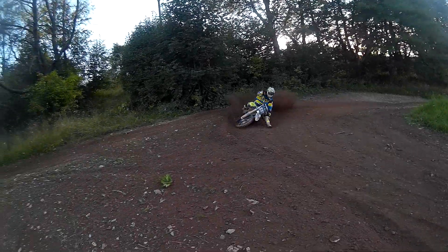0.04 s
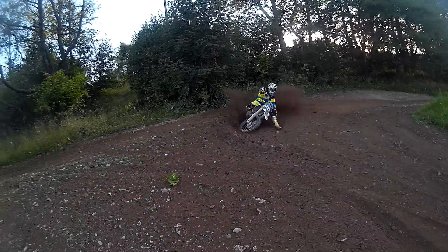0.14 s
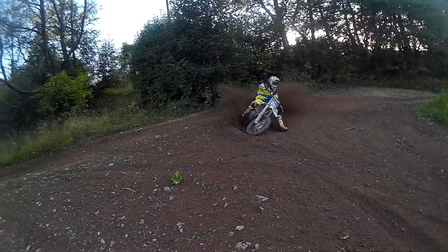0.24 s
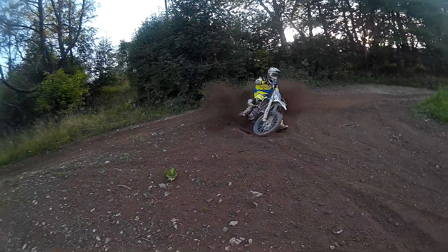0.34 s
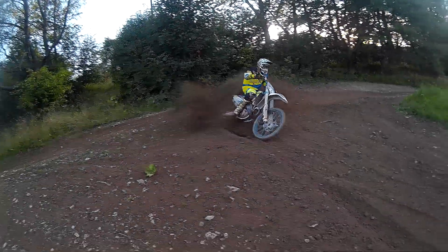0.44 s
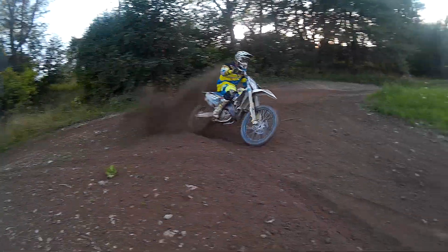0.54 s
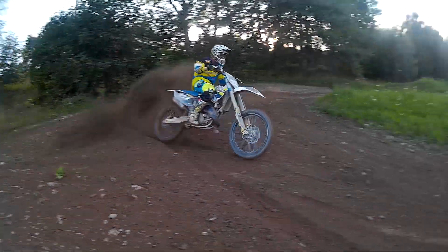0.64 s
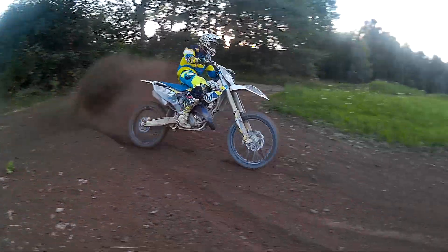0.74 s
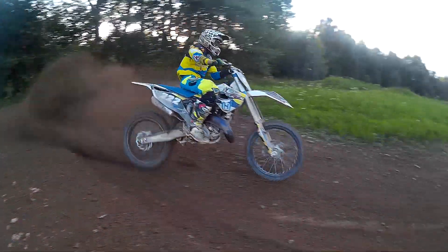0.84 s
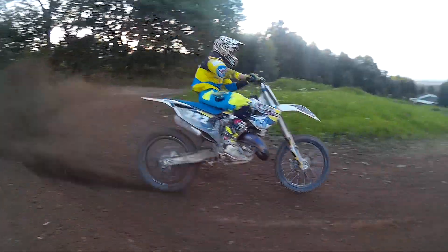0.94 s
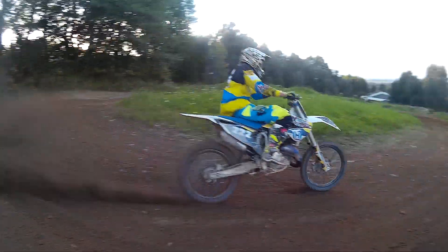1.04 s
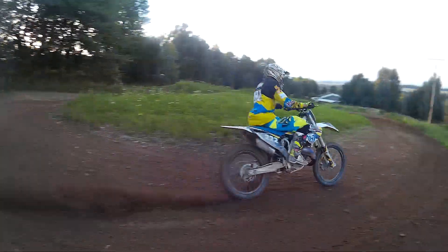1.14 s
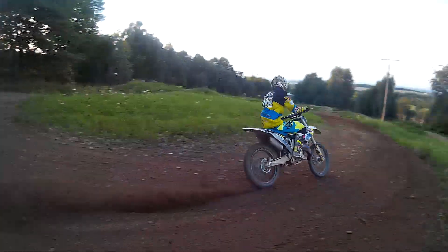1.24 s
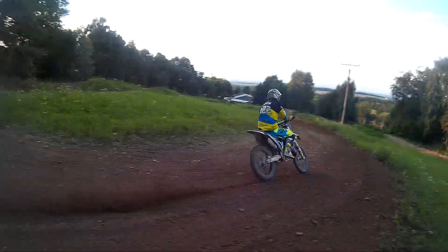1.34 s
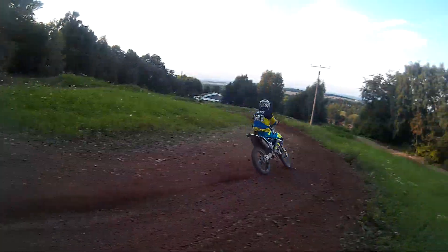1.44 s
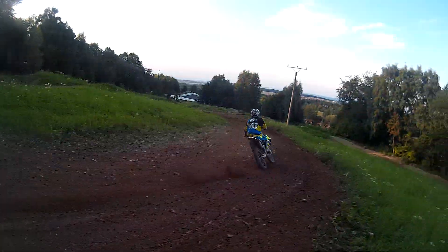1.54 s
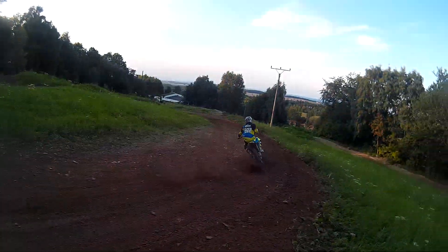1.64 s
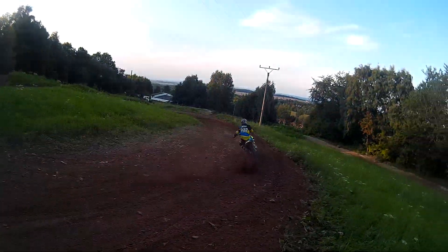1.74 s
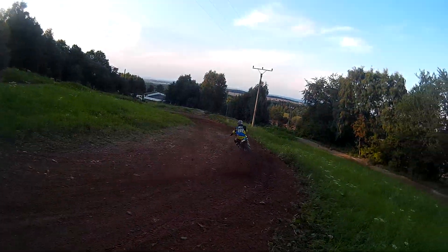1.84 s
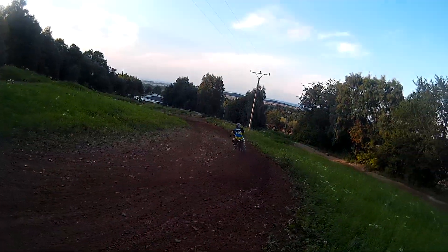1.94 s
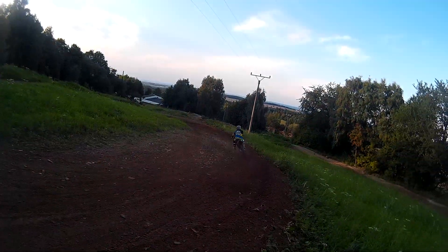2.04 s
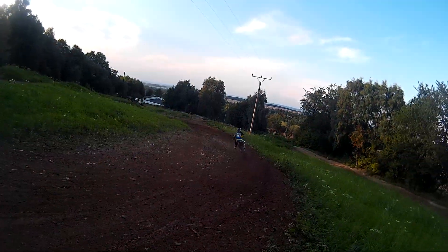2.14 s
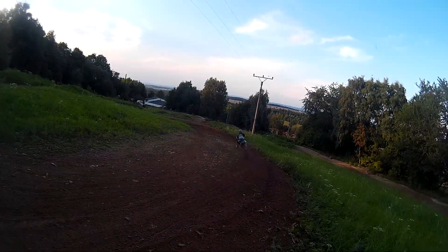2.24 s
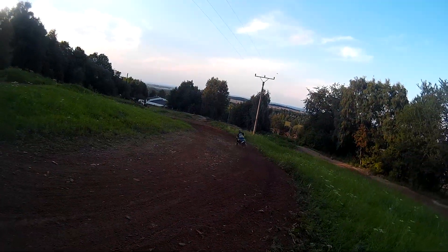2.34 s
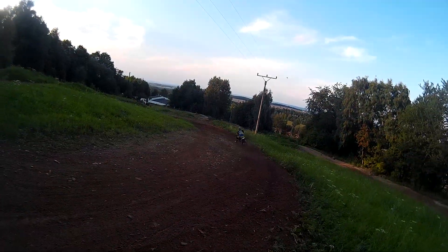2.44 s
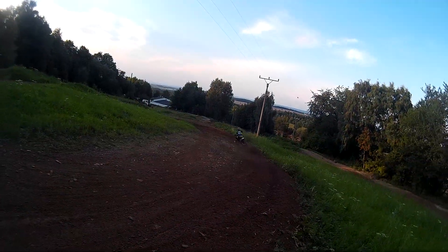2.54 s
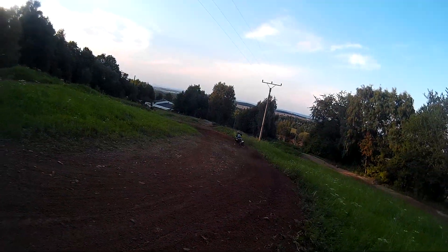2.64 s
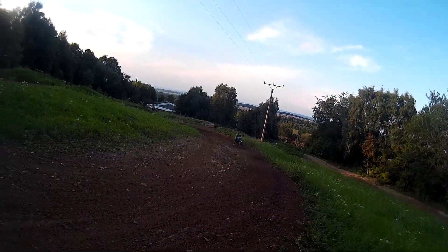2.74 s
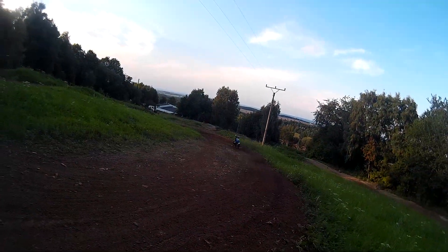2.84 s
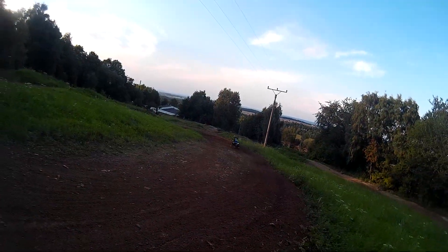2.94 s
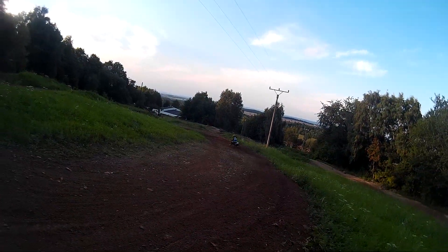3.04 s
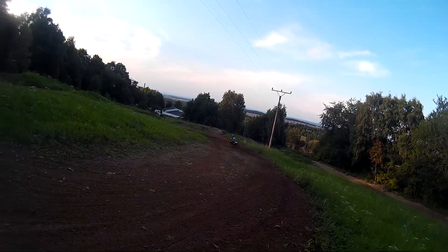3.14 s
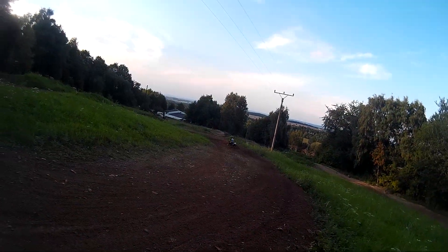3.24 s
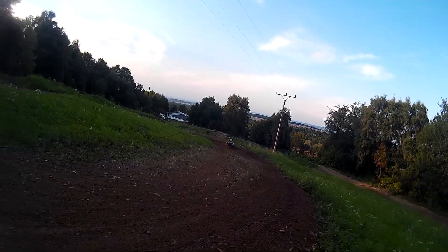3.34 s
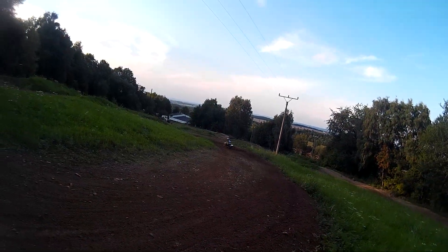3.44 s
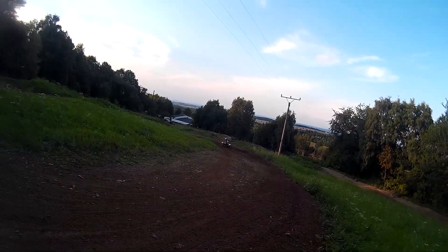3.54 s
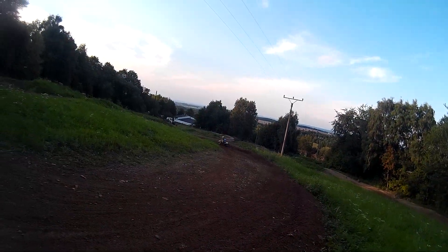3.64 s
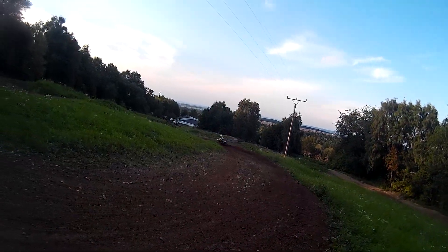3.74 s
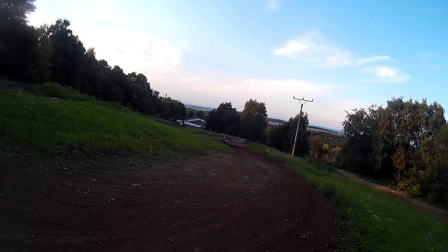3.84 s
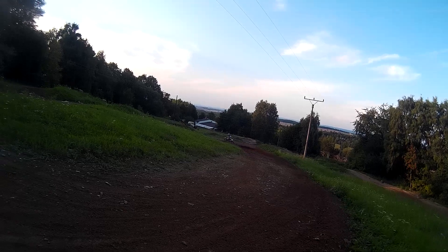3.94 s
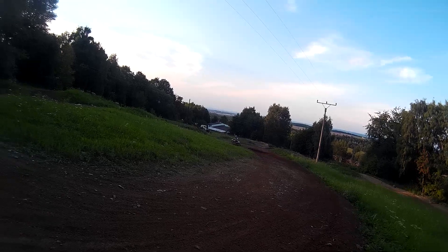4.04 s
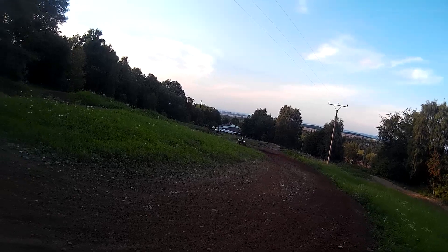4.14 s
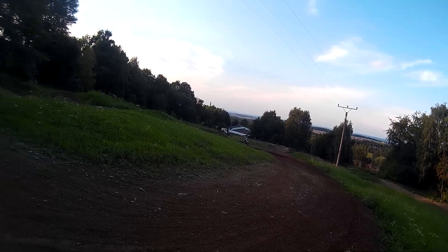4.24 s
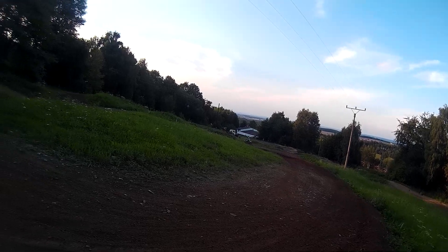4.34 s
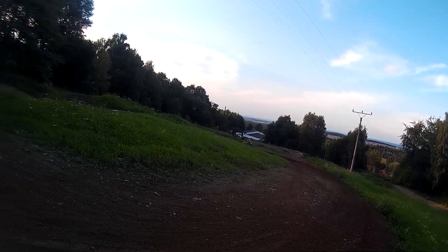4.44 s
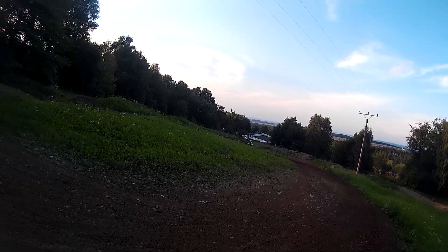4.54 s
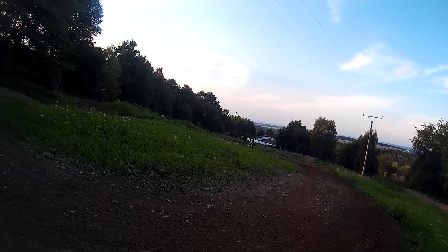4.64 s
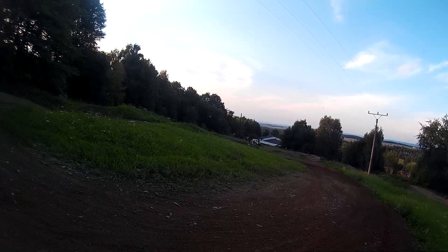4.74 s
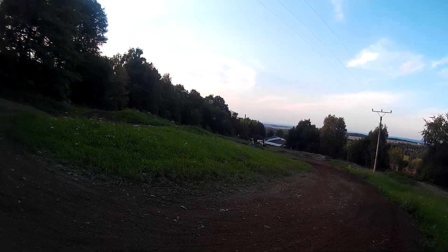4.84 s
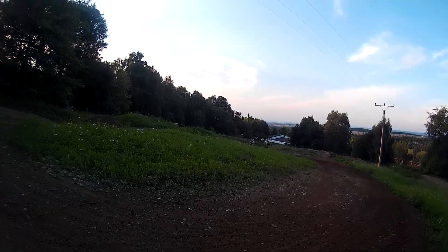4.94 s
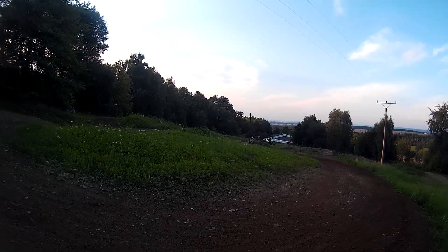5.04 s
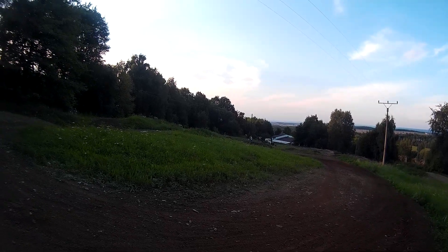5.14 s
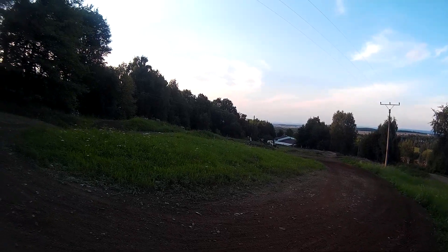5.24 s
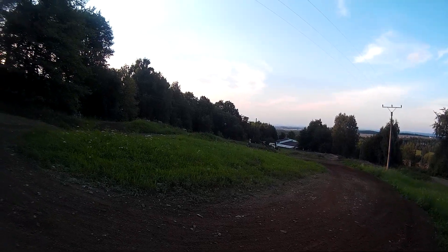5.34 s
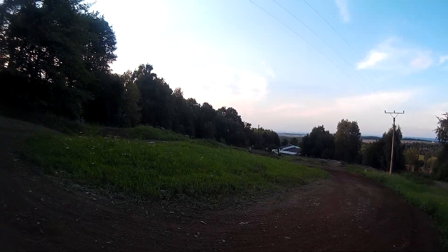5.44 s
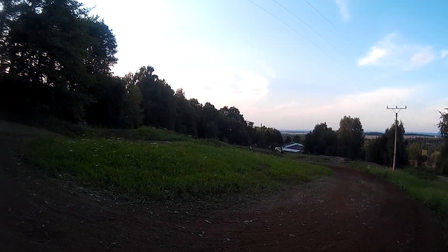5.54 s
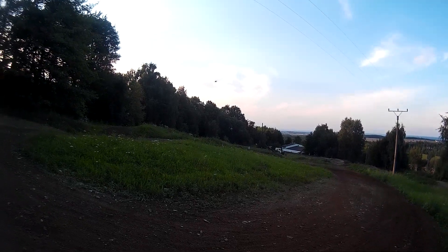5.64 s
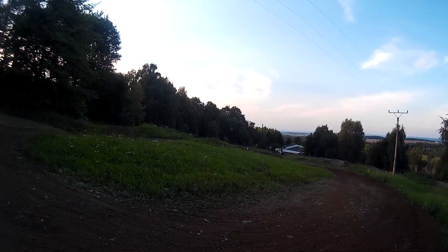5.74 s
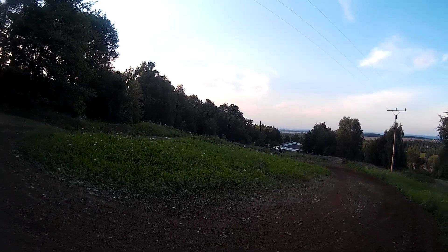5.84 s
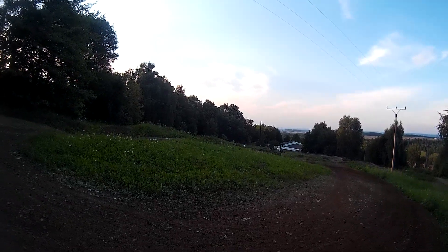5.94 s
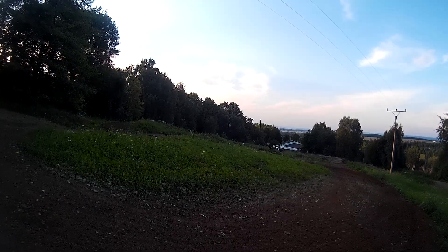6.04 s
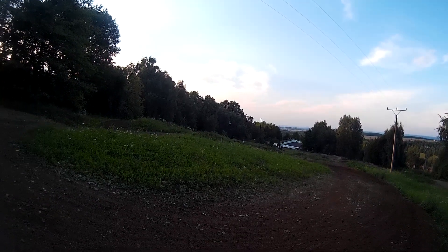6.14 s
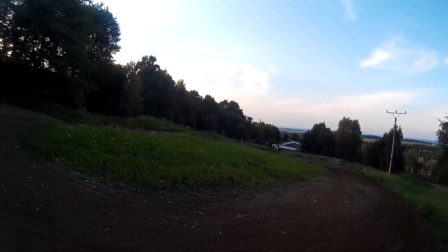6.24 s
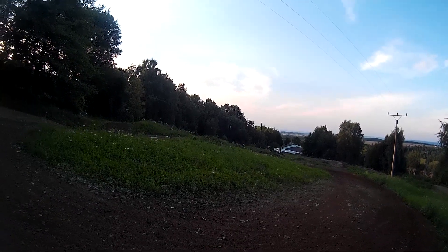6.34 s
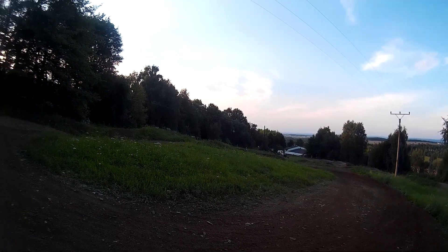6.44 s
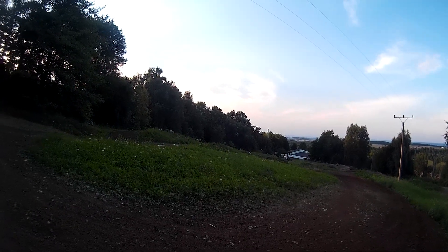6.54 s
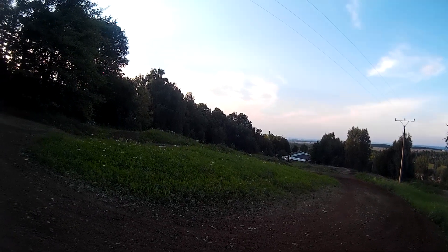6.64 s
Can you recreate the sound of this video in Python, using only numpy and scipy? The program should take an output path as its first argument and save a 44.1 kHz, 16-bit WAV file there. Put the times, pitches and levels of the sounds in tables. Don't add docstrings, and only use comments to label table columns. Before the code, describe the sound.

Outdoors on a dirt track, a two-stroke bike is loud at once, snarling through a corner and passing close about one second in. Its throttle chops into short bursts with coasting gaps and sharp exhaust pops. After four and a half seconds it drops behind a crest, leaving muffled, scattered blips, then only hiss and faint whine. The small camera's closed case makes everything hollow, nasal and ringing.

```python
import sys
import numpy as np
from scipy import signal
from scipy.fft import rfft, irfft, next_fast_len
from scipy.io import wavfile
from scipy.ndimage import uniform_filter1d, map_coordinates

SR = 44100
rng = np.random.default_rng(int(sys.argv[2]) if len(sys.argv) > 2 else 0)


def generate_wav(sig):
    pcm = np.round(np.clip(np.atleast_2d(sig).T, -1, 1) * 32767).astype(np.int16)
    wavfile.write(sys.argv[1], SR, pcm)


def invert_db(level):
    return 10 ** (np.asarray(level, dtype=float) / 20)


N = 294588

# (time [s], firings a second [Hz])
HELD_SPEED = [(0.0, 197.5), (0.36, 188.1), (0.5, 149.3), (0.7, 173.1), (0.92, 200.6), (1.2, 190.6),
              (1.43, 198.4), (2.1, 207.4), (3.0, 220.8), (3.12, 180), (3.36, 200.4), (4.45, 217.3),
              (4.58, 197.6), (4.8, 193.8), (5.34, 138.2), (5.51, 220.7), (5.76, 207.4), (5.9, 172.1)]
# (time [s], rise in speed [Hz], spread [s])
WHEEL_SPINS = [(0.25, 3.97, 0.043), (0.92, 12.9, 0.022), (1.31, 29.5, 0.044), (1.38, 8.4, 0.013),
               (1.61, 11, 0.022), (1.72, 3.2, 0.015), (2.03, 3.7, 0.045), (2.4, 10.0, 0.016),
               (2.94, 7.0, 0.045), (3.32, 14, 0.045), (3.41, 13.3, 0.022), (5.47, 9.3, 0.029)]
# (time [s], drop in speed [Hz], spread [s])
TYRE_BITES = [(0.12, 15.6, 0.041), (0.46, 3.37, 0.014), (0.58, 6.46, 0.046), (0.69, 14, 0.03),
              (0.83, 4.57, 0.015), (0.99, 3.97, 0.015), (1.11, 5.7, 0.031), (1.43, 11.3, 0.017),
              (1.48, 4.56, 0.035), (1.54, 10.6, 0.015), (1.66, 5.8, 0.026), (1.8, 5.4, 0.03),
              (1.92, 10.5, 0.032), (2.32, 4, 0.015), (2.45, 6.2, 0.03), (2.5, 21.8, 0.045),
              (2.58, 4.74, 0.015), (2.76, 21, 0.049), (3.06, 18.4, 0.047), (3.15, 9.6, 0.022),
              (3.48, 6.3, 0.017), (3.62, 9.3, 0.014), (3.72, 9.6, 0.044), (3.78, 7.2, 0.015),
              (3.94, 7.7, 0.015), (4.07, 8.0, 0.022), (4.21, 2.11, 0.043), (4.26, 10.4, 0.015),
              (4.39, 17.7, 0.03), (4.61, 13.7, 0.039)]
# (opens [s], shuts [s], effort at opening [dB], effort at shutting [dB])
THROTTLE = [(0.0, .27, 0, 1.5), (.27, 0.457, 0, -1.5), (0.451, 0.651, -2, 3), (0.667, 0.841, -3, 4),
            (0.876, 0.941, 4.5, 3.5), (.95, 1.14, -1.5, 0), (1.142, 1.273, -2.5, 2.5),
            (1.301, 1.39, -16.5, -11), (1.424, 1.514, 3, 0.5), (1.52, 1.751, 0.5, -1),
            (1.75, 1.951, -2, -2), (1.946, 2.148, -2, 1.5), (2.18, 2.329, -17.5, -17),
            (2.346, 2.411, -6.5, -10.5), (2.433, 2.473, -2.5, -2.5), (2.483, 2.604, -4.5, 3.5),
            (2.62, 2.763, -7, -23.5), (2.806, 2.846, -8.5, -8.5), (2.86, 3.011, -10, -11),
            (3.055, 3.101, -1.5, -13), (3.11, 3.267, -14.5, -3), (3.277, 3.365, 1.5, -1),
            (3.381, 3.48, -13.5, -22.5), (3.491, 3.565, -9.5, 0), (3.582, 3.79, -2.5, -3.5),
            (3.809, 4.21, 3, -2), (4.226, 4.296, -0.5, 2.5), (4.319, 4.401, -18.5, -37),
            (4.419, 4.443, -7.5, -2.5), (4.47, 4.631, -26, -35)]
# (opens [s], shuts [s], effort at opening [dB], effort at shutting [dB])
BEHIND_CREST = [
    (4.66, 4.899, -6.5, -22),
    (5.139, 5.213, -12, -14),
    (5.37, 5.493, -20, 1),
    (5.52, 5.79, -18, -13),
    (5.812, 5.87, 0.5, -4.5),
    (5.882, 6.102, -11, -22.5),
]
# (time [s], loss by distance [dB], pipe aimed at the camera [dB],
# air clearness [dB], ground lift [dB], upper bark share [0-1])
PATH = [(0, -30.5, 7, -5.5, -1.5, .6), (.22, -31.5, 10.5, -6, -6, 0.45), (.4, -29.5, 7.5, 0.5, 5, 0.43),
        (.52, -36.5, 16, -7, -3, 0.52), (.74, -32.5, 11, -6.5, 3.5, 1), (.88, -32.5, 7.5, -3, 0.5, 0.24),
        (1.1, -33.5, 13, -8, 9, 0.26), (1.45, -30, 9, -10, -2.5, 0), (1.8, -33, 8, -22, -0.5, 0.4),
        (2.15, -34, 7.5, -14.5, -2.5, 0.27), (2.47, -33, 9.5, -13, 6.5, 0.63),
        (2.95, -31, -0.5, -12.5, -7.5, 0.56), (3.15, -36.5, 9, -17, 4, 0.82),
        (4.3, -36, 10.5, -12.5, -8.5, 0.67), (4.68, -45.5, 1.5, -11.5, -17, 0.46),
        (5.15, -59, 1, -13, -10, 0.52), (5.49, -47, 7.5, -13, -13.5, .4), (5.85, -52, -4.5, -7.5, -22, 0.5)]
# (time [s], share of the drone above 500 Hz [0-1], edge against bark and rasp [dB],
# pitch cancelled by the ground bounce [Hz])
HEADING = [(0, 0.3, -10, 440), (.42, 0.94, -7.5, 430), (.55, 0.88, -8.5, 520), (.66, 0.98, -6, 456),
           (.75, .95, -11.5, 349.4), (.93, 0.32, -6, 780), (1.18, 0.62, -4, 1380), (1.47, 0.7, -1.5, 560),
           (1.8, 0.26, -14, 682.6), (2.13, 0.3, -9.5, 857), (2.45, 0.38, -5.5, 850), (2.75, 0.11, -5, 804),
           (3.1, 0.51, -0.5, 800), (3.35, 0.06, 2, 633), (3.7, .3, 2, 795), (3.9, 0.17, -2.5, 720),
           (4.5, 0.24, -1, 800), (5.45, 0.51, -2.5, 430.5)]
# (from [s], to [s])
HIDDEN = [
    (4.8, 5.34),
    (5.91, 7),
]
# (time [s], peak [dB], boom [dB], fade [s], snap [dB])
BACKFIRES = [
    (1.35, -36.5, 7.5, .12, -4.5),
    (1.3997, -26.5, -4.5, 0.0057, -0.5),
    (2.277, -8, -10.5, 0.024, -13),
    (2.3336, -15.5, -12, .015, -11),
    (2.9694, -41.5, 16, 0.038, -5),
    (4.5469, -19.5, -18, 0.017, -2.5),
]
# (pitch [Hz], width [Hz], level [dB])
CASE_RINGS = [(950, 290, -4.5), (1222, 141, 5), (1608.6, 101.4, 7), (2083, 250, -2.5), (2710, 688, -8.5),
              (3140, 610, -15.5), (3550, 35, -15.5), (3704, 200, -4), (4586, 210, -11), (5780, 320, -14),
              (6980, 390, -23.5), (8700, 1700, -34.5), (12000, 840, -31.5), (14600, 2200, -45.5)]
# (pitch [Hz], width [Hz], depth [dB])
CASE_NOTCHES = [(1809, 140, -11), (3510, 200, -8.5), (5180, 160, -10.5), (6540, 430, -19), (8060, 700, -9),
                (10200, 700, -2.5), (12800, 900, -9), (14300, 3600, -11)]
# (pitch [Hz], time to fall by 60 dB [s])
TREES = [(200, 0.14), (1500, 0.64), (3500, 0.19), (12000, 0.054)]
# (pitch [Hz], level [dB])
HISS = [(20, -1), (40, -11), (100, -12), (200, -15.5), (400, -23.5), (800, -30), (2000, -35), (5000, -40),
        (14500, -38), (15600, -43)]
# (pitch [Hz], level [dB])
WHINE = [(7842, -95), (7902, -90.5), (7963, -87), (8023, -91.5)]
# (from [Hz], to [Hz])
PARTS = [(100, 275), (270, 494), (500, 802), (900, 1380), (1380, 1790), (1940, 2910), (3400, 7500), (7500, 25000)]

SWELL_DB_S, DIE_DB_S, SHUT_DB = 483, 650, -28
MISFIRE_DB, MISFIRE_SPREAD_DB, ROUGHEST = -11, 1.6, .85
THUMP_FOLLOWS, DRONE_FOLLOWS, RASP_FOLLOWS = 0.31, .55, 0.54
PASS_S, TURN_S = 1.1, 0.23
CREST_S = 4.6
SHADE_DB, SHADE_S = -25.5, 0.04
BOUNCE_DEPTH, BOUNCE_WIDTH = 0.82, .2
TOP_HZ = 15730


def unit(x):
    return x / np.sqrt(np.mean(x ** 2) + 1e-20)


def along(points, hz):
    f, v = np.transpose(points)
    return np.interp(np.log(hz + 1), np.log(f + 1), v)


def curves(rows):
    s, *cols = np.transpose(rows)
    return [np.interp(np.arange(N) / SR, s, c) for c in cols]


def wobble(rate):
    knots = rng.standard_normal(int(N * rate / SR) + 4)
    return map_coordinates(knots, [np.arange(N) * rate / SR])


def filtered(x, response):
    m = next_fast_len(N + SR // 2)
    return irfft(rfft(x, m) * response(np.fft.rfftfreq(m, 1 / SR)), m)[..., :N]


def band(x, lo_hz, hi_hz):
    sos = signal.butter(4, [lo_hz, min(hi_hz, SR / 2.1)], "band", fs=SR, output="sos")
    return unit(signal.sosfilt(sos, x))


def window(f, lo_hz, hi_hz):
    return 1 / np.sqrt((1 + (lo_hz / (f + 1)) ** 12) * (1 + (f / hi_hz) ** 12))


def case(f):
    peaks, dips = 0, 1
    for k, (c, w, db) in enumerate(CASE_RINGS):
        peaks = peaks + (-1) ** k * invert_db(db) * 1j * f * w / (c * c - f * f + 1j * f * w)
    for c, w, db in CASE_NOTCHES:
        dips = dips * (c * c - f * f + 1j * f * w * invert_db(db)) / (c * c - f * f + 1j * f * w)
    return peaks * dips


def effort():
    t = np.arange(N) / SR
    pulls = []
    for a, b, a_db, b_db in THROTTLE + BEHIND_CREST:
        held = np.interp(t, [a, b], [a_db, b_db])
        pulls.append(held - SWELL_DB_S * np.maximum(a - t, 0) - DIE_DB_S * np.maximum(t - b, 0))
    return uniform_filter1d(np.maximum(np.max(pulls, axis=0), SHUT_DB), size=500)


def jolts(rows):
    t = np.arange(N) / SR
    return sum(hz * np.exp(-.5 * ((t - s) / spread) ** 2) for s, hz, spread in rows)


def revs():
    held = uniform_filter1d(curves(HELD_SPEED)[0], size=900)
    return held + jolts(WHEEL_SPINS) - jolts(TYRE_BITES)


def firing_lines(rate, turns, near, bounce_hz):
    grid = np.arange(0., 8000, 4)
    response = case(grid) + invert_db(-19) * (grid < 700)
    lines = np.zeros((len(PARTS), N))
    for k in range(1, 34):
        slot = (k * rate / 4).astype(int)
        slow_db = near * min(.6 * k, 4) * np.tanh(wobble(12)) * 1.4
        fading = invert_db(slow_db + min(.3 * k, 1.8) * wobble(40))
        drift = 1.5 * near ** 2 * wobble(5)
        if k < 14:
            off = np.log(k * rate / bounce_hz) / BOUNCE_WIDTH
            again = np.exp(-(2 * off - 2 * np.log(3) / BOUNCE_WIDTH) ** 2)
            fading *= 1 - BOUNCE_DEPTH * (np.exp(-off ** 2) + near ** 2 * again)
        tone = fading * np.real(response[slot] * np.exp(2j * np.pi * k * turns + 1j * drift))
        for line, (lo_hz, hi_hz) in zip(lines, PARTS):
            if lo_hz < k * 300 and hi_hz > k * 110:
                line += window(grid, lo_hz, hi_hz)[slot] * tone
    return lines


def gas_puffs(turns):
    puff = .5 + np.exp(-(turns % 1) / .5)
    return filtered(puff * rng.standard_normal(N), lambda f: case(f) + invert_db(-25) * (f < 700))


def engine():
    t, pull_db = np.arange(N) / SR, effort()
    far_db, aim_db, air_db, ground_db, upper = curves(PATH)
    mids, edge_db, bounce_hz = curves(HEADING)
    mids = np.clip(mids, 0, 1)
    hidden = sum(np.tanh((t - a) / SHADE_S) - np.tanh((t - b) / SHADE_S) for a, b in HIDDEN) / 2
    near = np.interp(t, [.95, 1.7], [1, .4])
    upper = np.clip(upper + 0.085 * near * wobble(20), 0, 1)

    low_db = far_db + SHADE_DB * hidden
    thump_db = low_db + THUMP_FOLLOWS * pull_db
    drone_db = low_db + ground_db + DRONE_FOLLOWS * pull_db
    bark_db = far_db + aim_db + pull_db
    rasp_db = far_db + aim_db + air_db + RASP_FOLLOWS * pull_db - 9 * hidden
    rattle_db = 0.77 * rasp_db + 0.22 * uniform_filter1d(rasp_db, size=15000) + 1.8 * wobble(18)
    tail_on = .5 + .5 * np.tanh((t - PASS_S) / TURN_S)
    sizzle_db = rattle_db - 4 - 8 * tail_on

    misfire = .5 - .5 * np.tanh((pull_db - MISFIRE_DB) / MISFIRE_SPREAD_DB)
    rough = .008 + .1 * near ** 2 + ROUGHEST * misfire
    scatter = np.clip(hidden + .5 * (t > CREST_S) * (t < 5), 0, 1)
    rough = np.maximum(rough, ROUGHEST * scatter)

    rate = revs() * (1 + .0015 * wobble(45))
    turns = np.cumsum(rate) / SR + .003 * wobble(120)
    lines, air = firing_lines(rate, turns, near, bounce_hz), gas_puffs(turns)
    share = [rough * .03, .006 + rough * .08, .025 + rough * .35, rough, rough,
             rough ** .52, .22 + .78 * rough ** .6, 1]
    thump, second, third, low, high, edge, rasp, sizzle = [
        np.sqrt(1 - a) * unit(line) + np.sqrt(a) * band(air, *hz) for a, line, hz in zip(share, lines, PARTS)]

    drone = np.sqrt(1 - mids) * second + np.sqrt(mids) * third
    bark = np.sqrt(1 - upper) * low + np.sqrt(upper) * high
    treble = invert_db(edge_db + 0.57 * bark_db + 0.46 * rasp_db) * edge
    treble += invert_db(rasp_db) * rasp + invert_db(sizzle_db) * sizzle
    return invert_db(thump_db) * thump + invert_db(drone_db) * drone + invert_db(bark_db) * bark + treble


def camera_noise(loudness):
    t = np.arange(N) / SR
    hiss = unit(filtered(rng.standard_normal(N), lambda hz: invert_db(along(HISS, hz))))
    whine = sum(np.sqrt(2) * invert_db(db) * np.sin(2 * np.pi * hz * t) for hz, db in WHINE)
    shake = band(np.cumsum(rng.standard_normal(N)), 13, 150) * invert_db(-46.0) * loudness ** 0.3
    grit = band(hiss, 210, 16000) * invert_db(-42.5) * loudness ** 0.54
    return invert_db(-59.0) * hiss + grit + whine * (1 + 25 * loudness ** .5) + shake


def trees(x):
    hz, t, z = signal.stft(rng.standard_normal(SR), SR, nperseg=256)
    fade = invert_db(-60 * t / along(TREES, hz)[:, None])
    tail = signal.istft(z * fade, SR, nperseg=256)[1]
    late = np.pad(x, (1300, 0))
    return signal.fftconvolve(late, tail / np.linalg.norm(tail))[:N]


def backfires():
    t = np.arange(N) / SR
    crack = filtered(rng.standard_normal(N), lambda f: case(f) * (f / 1500) ** 0.53)
    crack = band(crack, 900, 13000)
    boom = band(rng.standard_normal(N), 150, 720)
    body, snap = band(crack, 900, 2100), band(crack, 2300, 12500)
    out = np.zeros(N)
    for s, db, boom_db, fade, snap_db in BACKFIRES:
        u = np.maximum(t - s, 0) / max(fade, .002) * 3.8
        burst = body + invert_db(snap_db) * snap + invert_db(boom_db) * boom
        out += invert_db(db - 13.0) * u * np.exp(1 - u) * burst
    return out


def scene():
    bike = engine() + backfires()
    return (bike + invert_db(-19) * trees(bike))[None]


def top_cut(x):
    return signal.sosfilt(signal.butter(12, 15690, fs=SR, output="sos"), x)


def record(dry):
    loudness = np.sqrt(np.abs(uniform_filter1d(dry[0] ** 2, size=4500)))
    x = dry / (1 + np.abs(dry / .75) ** 5) ** (1 / 5)
    mix = filtered(x + camera_noise(loudness), lambda hz: np.clip((TOP_HZ - hz) / 60, 0, 1))
    return top_cut(mix)


dry = scene()
out = record(dry)
generate_wav(out)
```